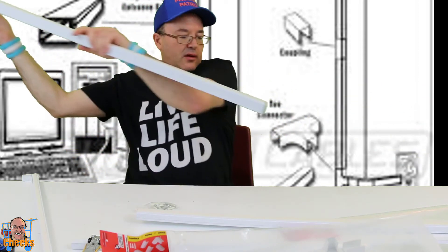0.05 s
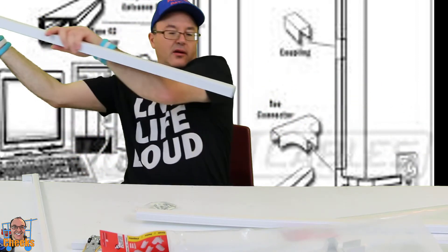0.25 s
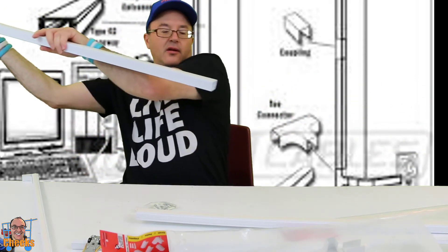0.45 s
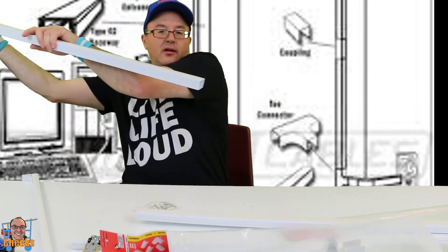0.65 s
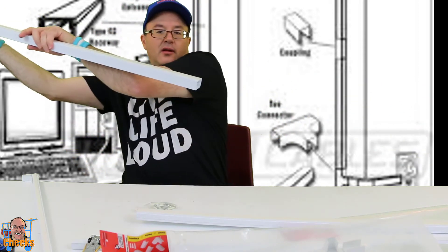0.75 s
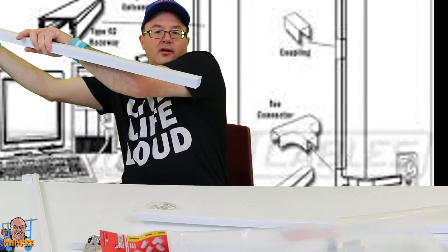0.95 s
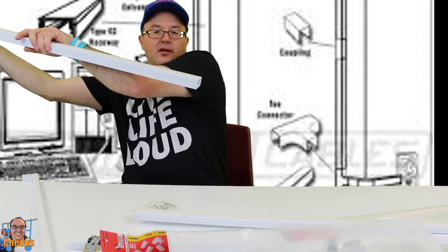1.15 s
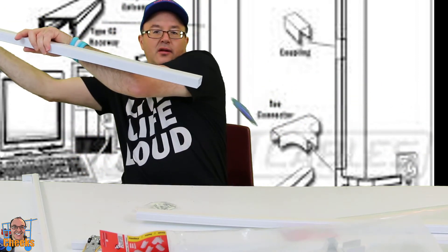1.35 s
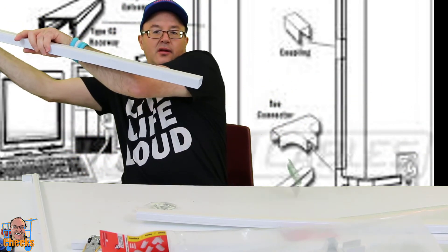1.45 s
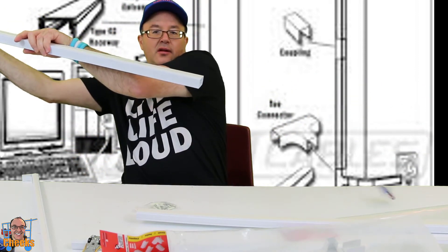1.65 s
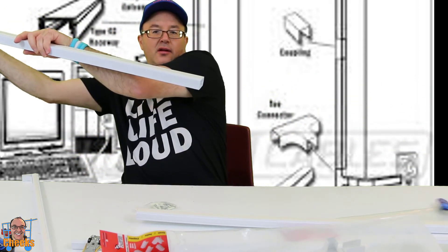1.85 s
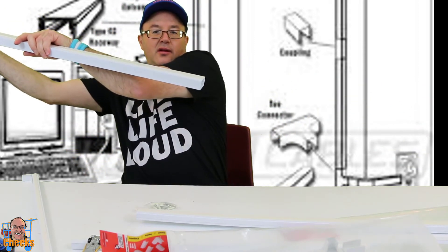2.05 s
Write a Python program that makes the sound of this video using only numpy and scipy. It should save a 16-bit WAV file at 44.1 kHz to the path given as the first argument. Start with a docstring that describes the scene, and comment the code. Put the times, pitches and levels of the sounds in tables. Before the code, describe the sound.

A small hard object slides down a plastic channel, then bounces on a table.

```python
"""A table in a small, quiet room, the microphone close by. A small hard object knocks as it is set
into a tilted plastic channel, then slides down, rubbing and chattering more as it gains speed.
It leaves the end ringing faintly, bounces three times on the hollow table top and skitters away.
The room answers each touch; this near, the microphone overloads on the bounces."""
import sys
import numpy as np
from scipy import signal
from scipy.io import wavfile

SR = 44100
rng = np.random.default_rng(int(sys.argv[2]) if len(sys.argv) > 2 else 0)


def digitize_waveform(pressure):
    """Quantize a signal to 16-bit integers and store it at the path in sys.argv[1].

    Rows of a 2-D input are taken as channels; values are limited to [-1, 1].
    """
    field = np.atleast_2d(pressure).T
    bounded = np.clip(field, -1, 1)
    quanta = np.round(bounded * 32767).astype(np.int16)
    wavfile.write(sys.argv[1], SR, quanta)


N = 92610
T = np.arange(N) / SR


def amp(db):
    """Decibels to gain."""
    return 10 ** (np.asarray(db) / 20)

def unit(x):
    """Scales to rms 1."""
    return x / np.sqrt(np.mean(x ** 2) + 1e-20)

def unit_energy(x):
    """Scales to energy 1."""
    return x / np.linalg.norm(x)

def read(points, hz):
    """Reads a table on a log-frequency axis."""
    f, value = np.transpose(points)
    return np.interp(np.log(hz + 1), np.log(f), value)

def add(mix, s, sound):
    """Mixes a sound in at s seconds."""
    part = mix[round(s * SR):][:len(sound)]
    part += sound[:len(part)]

def through(x, response):
    """Convolves and cuts to length."""
    return signal.fftconvolve(x, response)[:N]

def colour(x, spectrum, tilt_db=0, corner_hz=790):
    """Causal filter of unit energy: a spectrum, tilted by tilt_db per octave above the corner."""
    hz = abs(np.fft.fftfreq(2048, 1 / SR))
    octaves = np.log2(1 + (hz / corner_hz) ** 2) / 2
    log_gain = np.log(amp(read(spectrum, hz) + tilt_db * octaves))
    minimum_phase = np.exp(np.conj(signal.hilbert(log_gain)))
    taps = np.fft.ifft(minimum_phase).real[:len(hz) // 2]
    return through(x, unit_energy(taps))

def dying(t60, t=T):
    """Decay that falls 60 dB in t60 seconds."""
    return np.exp(-np.log(1000) * t / t60)

def burst(rise_s, t60):
    """Dense, quickly dying vibration of unit energy."""
    t = T[:SR // 4]
    return unit_energy(rng.standard_normal(len(t)) * (1 - np.exp(-t / rise_s)) * dying(t60, t))

def modes(table, t=T):
    """Sum of dying sines."""
    return sum(amp(db) * dying(t60, t) * np.sin(2 * np.pi * hz * t) for hz, db, t60 in table)

def tail(t60s):
    """Diffuse tail of unit energy; each band dies at its own speed."""
    hz, t, bands = signal.stft(rng.standard_normal(SR), SR, nperseg=256)
    return unit_energy(signal.istft(bands * dying(read(t60s, hz)[:, None], t), SR)[1])

def resonate(x, hz, width):
    """One resonance, returned at the level of its input."""
    return unit(signal.lfilter(*signal.iirpeak(hz, hz / width, SR), x)) * np.std(x)

def wander(hz):
    """Random curve of rms 1 that changes up to this rate."""
    low_pass = signal.butter(2, hz, fs=SR, output="sos")
    return unit(signal.sosfilt(low_pass, rng.standard_normal(N + SR))[SR:])


# The room's air at the microphone. Each row: frequency in Hz, spectral level in dB.
AIR_SPECTRUM = [(25, -8), (60, 2.5), (150, 3), (400, -0.5), (1000, -31), (2000, -24), (3500, -26),
                (6000, -18), (15500, -23)]

def room_air(db=-56.5):
    """Quiet, low air noise lies under everything."""
    return amp(db) * colour(rng.standard_normal(N), AIR_SPECTRUM)


# Knocks in the channel, heard close. Each row: start in seconds, level in dB, treble tilt in dB
# per octave, relative wall ring in dB, rattle t60 in seconds.
KNOCKS = [(.061, -28.5, -2.5, 0.5, 0.031), (.084, -28.5, -21.5, -20, 0.051), (.167, -34.5, -3, 7, 0.068),
          (.207, -29.5, -6.5, 7.5, 0.11), (0.2319, -14, -1, 5, 0.054), (0.2413, -10, -3.5, -8, 0.041),
          (0.26, -2.5, 2, 7, 0.018), (.263, -4, 2, -2, 0.12), (.344, -18, -5, 5, 0.031),
          (0.418, -15.5, -5.5, 2, 0.08), (.524, -19, -2.5, 4, 0.07), (.824, -26, -1, -13, 0.028),
          (0.872, -12, .5, 3.5, 0.071), (0.905, -8.5, 1, -2, 0.069), (.94, -13, 1, -17, .055),
          (.9755, -7.5, -1.5, -14, 0.022), (.992, -16, -2, -9, 0.03), (1.01, -12, -.5, -8, 0.032),
          (1.026, -12.5, -25, 4, 0.031), (1.0415, -17, 0, 2, .035), (1.059, -5.5, 0, -16, 0.046),
          (1.077, -10.5, 1, 0, 0.024), (1.0945, -18, 4, -9, 0.019), (1.115, -19, 2, 0, 0.017),
          (1.1339, -17, .5, 8.5, 0.019), (1.1515, -11, 2, -7, 0.034), (1.1665, -20, 12, 13, 0.025),
          (1.186, -27, -8, -6, .035), (1.2089, -12, 4.5, 5.5, 0.066), (1.238, -9, 1, -17, 0.11),
          (1.277, -16.5, 8.5, -14, 0.05), (1.288, -23, 15, 8, .04)]
# Colour of the plastic wall. Each row: frequency in Hz, spectral level in dB.
WALL_SPECTRUM = [(40, -22), (110, -26), (260, -37.5), (400, -3.5), (800, 4.5), (1000, -6.5), (1600, 0.5),
                 (2300, 0), (3600, 1), (4800, -4), (7000, -11.5), (10000, -16.5), (15500, -27)]
# The wall's ring. Each row: frequency in Hz, level in dB, t60 in seconds.
WALL_MODES = [(549, -15, 0.28), (679.6, -8.5, 0.5), (834, -15, 0.11), (1010, -23, 0.088), (1096, -12, 0.18),
              (1466, -6, 0.18), (1658, 1, 0.044), (1943, 3.5, 0.048), (2180, -10.5, 0.085)]

def knocks(rattle_db=11, wall_db=5):
    """The object is set in, then jolts against the walls; each jolt is a short rattle that rings them."""
    out, wall = np.zeros(N), modes(WALL_MODES)
    for s, db, tilt_db, ring_db, t60 in KNOCKS:
        jolt = burst(0.00071, t60)
        add(out, s, amp(rattle_db + db) * colour(jolt, WALL_SPECTRUM, tilt_db))
        add(out, s, amp(wall_db + db + ring_db) * unit_energy(through(jolt, wall)))
    return out


# Strength of the rubbing. Each row: time in seconds, level in dB.
RUB_LEVEL = [(.2, -55), (.27, -36), (.32, -34.5), (.6, -31.5), (.8, -31.5), (.89, -29), (1.1, -29.5),
             (1.19, -29.5), (1.23, -29.5), (1.265, -32), (1.29, -36), (1.33, -68), (1.4, -69)]
# At the channel's top, middle and mouth: passing time in seconds, then chatter depth in dB.
PASS_S = [0.35, 0.9, 1.06]
CHATTER_DEPTH_DB = [1.5, 3.2, 3.8]
# Rubbing colour at those places. Each row: frequency in Hz, spectral level in dB.
RUB_TOP = [(35, -62), (60, -39), (123, -47), (163, 1), (242, -18), (343, -9), (673, 2), (721, -3), (849, 5),
           (1050, -4.5), (1870, -5.5), (3670, -8.5), (15500, -56.5)]
RUB_MIDDLE = [(35, -90), (60, -45), (175, 2), (278, -10.5), (312, -6), (509, -1), (559, -1), (931, -23),
              (1100, 3), (1550, -19.5), (2010, 0.5), (3500, -4), (15500, -48)]
RUB_MOUTH = [(35, -71), (60, -14), (231, -16), (259, -45), (343, 2.5), (413, -9.5), (521, -5), (756, 0),
             (999, -9), (1230, -4), (1480, -7.5), (3190, -4), (15500, -43.5)]
# The channel's hollow tone. Each row: frequency and width in Hz, level in dB at top, middle and mouth.
CHANNEL_RESONANCES = [(175.7, 14.4, -13.5, -6.5, -26), (351.4, 13, -14.5, -24, -29),
                      (568, 14, -52, -18.5, -12), (817, 9.3, -49, -16, -11.5), (1132, 10, -17.5, -27, -26),
                      (1266, 25, -31, -42, -8.5), (1485, 8.7, -17, -18, -17.5),
                      (1797, 33, -18.5, -14, -16.5), (2044, 25, -62, -14, -58), (2550, 36, -46, -32, -17),
                      (2810, 92, -12, -24, -23), (3348, 41, -22, -11, -11)]
# Wall resonances that swell as the object passes the spot that drives them.
# Each row: peak time and spread in seconds, frequency and width in Hz, level in dB.
WALL_SWELLS = [(.44, 0.036, 1800, 66, -5.5), (.77, 0.085, 1340, 120, -10), (.85, 0.025, 2140, 130, -11),
               (.88, .08, 2900, 200, -16), (.98, 0.017, 3450, 160, 1.5), (1.07, 0.034, 171, 9.9, -15),
               (1.13, 0.04, 350, 12, -7), (1.17, 0.069, 810, 32, -14.5), (1.18, 0.034, 1240, 93, -9),
               (1.23, .04, 2500, 250, -3.5)]

def slide(grains_per_s=2500, grain_db=2, chatter_hz=128, ring_db=-55):
    """Friction grains, clumped by chatter, shake the channel; its colour changes along the way down."""
    grains = rng.choice([-1, 1], N) * (rng.random(N) < grains_per_s / SR)
    grains = grains * amp(grain_db * np.minimum(rng.exponential(1, N), 3))
    chatter = amp(np.interp(T, PASS_S, CHATTER_DEPTH_DB) * np.tanh(wander(chatter_hz)))
    drive = unit(grains * chatter) * amp(np.interp(T, *np.transpose(RUB_LEVEL)))
    top, middle, mouth = [drive * np.interp(T, PASS_S, share) for share in np.eye(3)]  # crossfades
    wall = colour(top, RUB_TOP) + colour(middle, RUB_MIDDLE) + colour(mouth, RUB_MOUTH)
    hollow = sum(resonate(drive * amp(np.interp(T, PASS_S, place_db)), hz, width)
                 for hz, width, *place_db in CHANNEL_RESONANCES)
    swells = sum(resonate(drive * amp(db) * np.exp(-((T - s) / spread_s) ** 2 / 2), hz, width)
                 for s, spread_s, hz, width, db in WALL_SWELLS)
    ring = amp(ring_db) * unit(through(mouth, object_ring()))
    return wall + hollow + swells + ring


# The object's own ring. Each row: frequency in Hz, level in dB, t60 in seconds.
OBJECT_MODES = [(3070, -1, 0.7), (4640, 8.5, 0.26), (5670, -0.5, 0.65), (7510, 17, 0.052), (8040, -13, 1),
                (7330, -2, 0.2), (9300, -1, 0.14), (10200, 12, 0.14), (9100, 12.5, 0.086), (12250, -1, .38),
                (13108, -8, .3), (13550, -9, .4), (14800, -6, 0.27)]
# Its crowded high partials. Each row: frequency in Hz, spectral level in dB.
SHIMMER_SPECTRUM = [(100, -47), (4000, -15), (8500, -7), (9700, 8), (11000, -1), (13600, -2), (15500, -3)]

def object_ring(tilt_db=0, pivot_hz=8000, tumble_hz=90, tumble_depth=1.8, shimmer_db=25):
    """The object tumbles, so each partial swells and fades under a shimmer of crowded high ones."""
    partials = np.zeros(N)
    for hz, db, t60 in OBJECT_MODES:
        tumble = unit(1 + tumble_depth * wander(tumble_hz))
        partials += tumble * modes([(hz, db + tilt_db * np.log2(hz / pivot_hz), t60)])
    shimmer = unit_energy(rng.standard_normal(N) * dying(t60=0.6))
    return partials + amp(shimmer_db + tilt_db) * colour(shimmer, SHIMMER_SPECTRUM)


# Touches that ring the object. Each row: start in seconds, level in dB, tilt in dB per octave.
RING_TOUCHES = [(1.285, -49.5, 5.5), (1.363, -62.5, 22), (1.386, -57, 4), (1.4788, -57, -3),
                (1.6451, -49.5, -4), (1.771, -55, -3.5)]

def ringing():
    """The object rings on in the air after leaving the channel and after each bounce."""
    out = np.zeros(N)
    for s, db, tilt_db in RING_TOUCHES:
        add(out, s, amp(db) * object_ring(tilt_db))
    return out


# Light touches on the table, near the microphone. Each row: start in seconds, level in dB,
# treble tilt in dB per octave, rise and t60 in seconds, relative shell ring in dB.
CLATTER = [(1.386, -27, 7, 0.00068, 0.024, -5), (1.738, 0, 0, .0003, 0.043, -2),
           (1.747, -4.5, -2, 0.00048, 0.063, 2), (1.765, -4, -1, 0.00015, 0.0068, -20),
           (1.807, 2, -5.5, 0.0012, 0.26, -11), (1.87, -7, 0, 0.00071, .04, -23),
           (1.878, -4, 1.5, 0.00097, 0.13, -17), (1.931, -8.5, 1, 0.00071, 0.16, -7),
           (1.944, -11.5, 0.5, 0.0024, 0.19, -5)]
# Colour of a skid. Each row: frequency in Hz, spectral level in dB.
SKID_SPECTRUM = [(100, -3), (400, 5.5), (1400, 5), (3600, 5), (5000, -7), (8500, -8), (11000, -9),
                 (15500, -20)]
# Short ring of the object's shell. Each row: frequency in Hz, level in dB, t60 in seconds.
SHELL_MODES = [(1517, 7.5, 0.056), (2340, -3, 0.099), (2790, -2, 0.033), (3580, 5.5, 0.021),
               (4010, -18, .06), (4900, -6, .06), (7300, -2, 0.033), (7978, -10, .05), (10095, 1.5, 0.023),
               (9970, -5, 0.038), (11100, 0, 0.029), (11800, -7, 0.045), (12780, -10, .035)]

def clatter(ticks_per_s=700, pivot_hz=3000):
    """The object glances and skids; each touch is a run of tiny ticks that ring its shell."""
    out = np.zeros(N)
    for s, db, tilt_db, rise_s, t60, shell_db in CLATTER:
        skid = burst(rise_s, t60)
        ticks = skid * (rng.random(len(skid)) < ticks_per_s / SR)
        shell = [(hz, mode_db + tilt_db * np.log2(hz / pivot_hz), ring_s)
                 for hz, mode_db, ring_s in SHELL_MODES]
        ring = through(ticks, modes(shell, T[:len(skid)]))
        add(out, s, amp(db) * colour(skid, SKID_SPECTRUM, tilt_db))
        add(out, s, amp(db + shell_db) * unit_energy(ring))
    return out


# Landings, heard close. Each row: start in seconds, thud level in dB, thud pitch in Hz,
# click level in dB, dense ring in dB, bass cut in Hz.
BOUNCES = [(1.4793, 0, 900, 2.5, 1.5, 255), (1.6454, -4.5, 605, 0.5, 6, 474),
           (1.7735, -2, 1320, -4, -7.5, 795)]
# Table top modes. Each row: frequency in Hz, t60 in seconds, level in dB at each of three landing spots.
TABLE_MODES = [(151.1, 0.71, -10.5, -8, -12), (272, 0.22, -5, -15, -10), (349, 0.74, -37, -9.5, -12),
               (421, 0.11, -13, 1.5, -2), (513, .73, -34, -14.5, -14), (590.6, 0.59, -15, -12.5, -9.5),
               (674, 0.04, -9, 1, -10), (829.4, 0.17, -3.5, 1.5, 3), (870, 0.44, -18, -12, -11.5),
               (960, .22, -23, -24, -10), (1046, 0.095, -13, -8, -2), (1152, 0.043, -5, -21, 2.5),
               (1255, 0.042, 6, 3, -10), (1510, .12, -10, 4, 1.5), (1890, .04, -11, -14, -10),
               (2180, 0.02, -21, 15, 14.5), (2417, 0.053, -17, 1, 4.5), (3780, .03, 6, 17, 4)]
# Colours of the top's dense ring and of the click. Each row: frequency in Hz, spectral level in dB.
BOARD_SPECTRUM = [(40, -39), (130, 4.5), (300, 3), (600, -0.5), (850, 6), (1100, 3.5), (1600, 6.5),
                  (2300, -2.5), (3200, -3), (8000, -25)]
CLICK_SPECTRUM = [(200, 7.5), (1500, 11.5), (3800, 3.5), (5200, -3), (7300, -1.5), (8500, -10),
                  (10500, -4.5), (15500, -9)]
# Decay of the dense ring. Each row: frequency in Hz, t60 in seconds.
BOARD_T60 = [(100, 1.8), (400, 0.73), (1000, 0.69), (2000, 0.75), (5000, 0.36)]

def bounces(decay_cycles=0.4):
    """Each landing is a short thud that rings the hollow table top, plus a hard click."""
    out = np.zeros(N)
    for spot, (s, db, hz, click_db, ring_db, cut_hz) in enumerate(BOUNCES):
        cycles = hz * T[:SR // 20]
        thud = -amp(5.5 + db) * np.sin(2 * np.pi * cycles) * np.exp(-cycles / decay_cycles)
        thud = signal.lfilter(*signal.butter(1, cut_hz, "high", fs=SR), thud)
        add(out, s, thud)
        tones = modes([(mode_hz, spot_db[spot], t60) for mode_hz, t60, *spot_db in TABLE_MODES])
        dense_ring = colour(tail(BOARD_T60), BOARD_SPECTRUM)
        slap = colour(burst(rise_s=0.00086, t60=0.048), BOARD_SPECTRUM)
        for response in (amp(-8) * slap, amp(ring_db - 14) * dense_ring, amp(-37.5) * tones):
            add(out, s, through(thud, response))
        click = colour(burst(rise_s=0.00076, t60=0.012), CLICK_SPECTRUM)
        add(out, s, amp(4.5 + click_db) * click)
    return out


# Decay of the small room around the table. Each row: frequency in Hz, t60 in seconds.
ROOM_T60 = [(100, 0.48), (500, 0.3), (2000, 0.42), (6000, 0.39), (15000, 0.19)]

def scene(low_cut_hz=160):
    """One close microphone hears channel and table, the room behind them."""
    low_cut = signal.butter(3, low_cut_hz, "high", fs=SR, output="sos")
    channel = signal.sosfilt(low_cut, slide() + knocks())  # the narrow channel radiates little bass
    near = channel + clatter() + ringing()
    table = bounces()
    room = through(amp(-11.5) * near + amp(-14) * table, tail(ROOM_T60))
    return (near + table + room + room_air())[None]

def record(dry):
    """The microphone's input clips on the hardest peaks; then the highest treble is cut."""
    ceiling, edge_hz = 0.72, 15900
    low_pass = signal.firwin(511, edge_hz, window=("kaiser", 9), fs=SR)
    return signal.oaconvolve(np.clip(dry, -ceiling, ceiling), low_pass[None], "same")


dry = scene()
out = record(dry)
digitize_waveform(out)
```